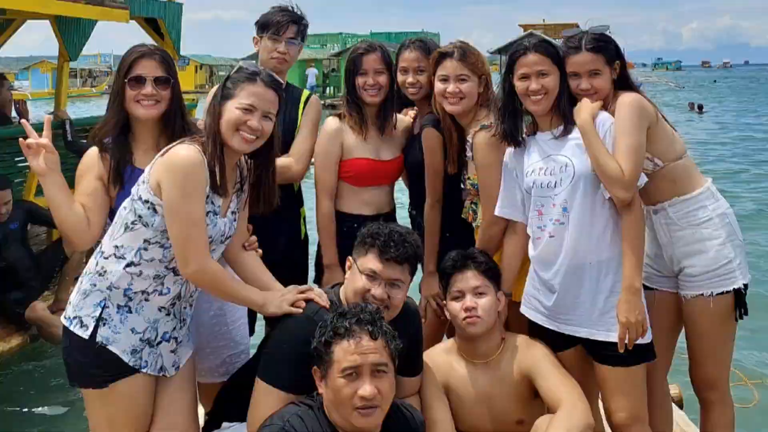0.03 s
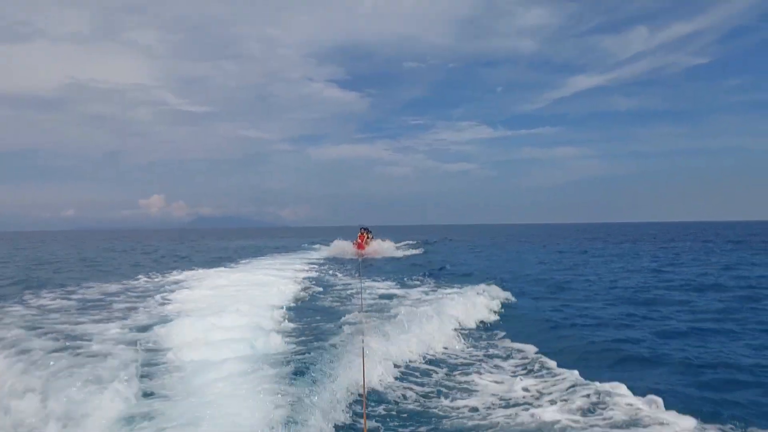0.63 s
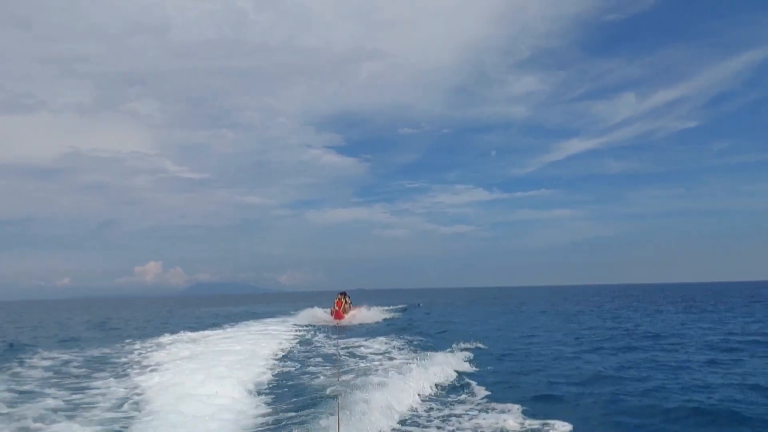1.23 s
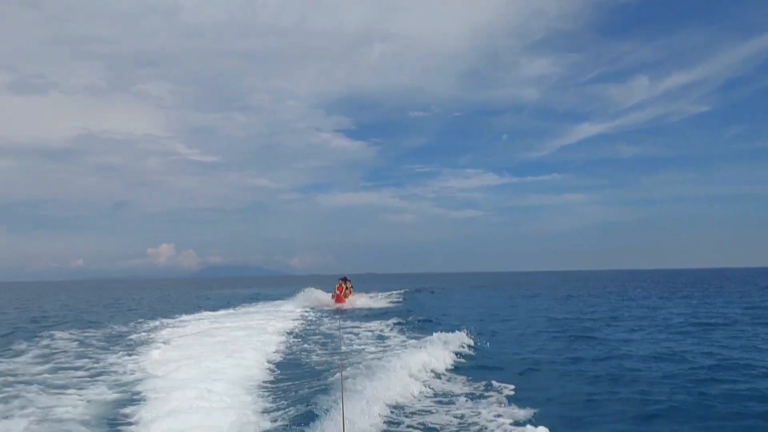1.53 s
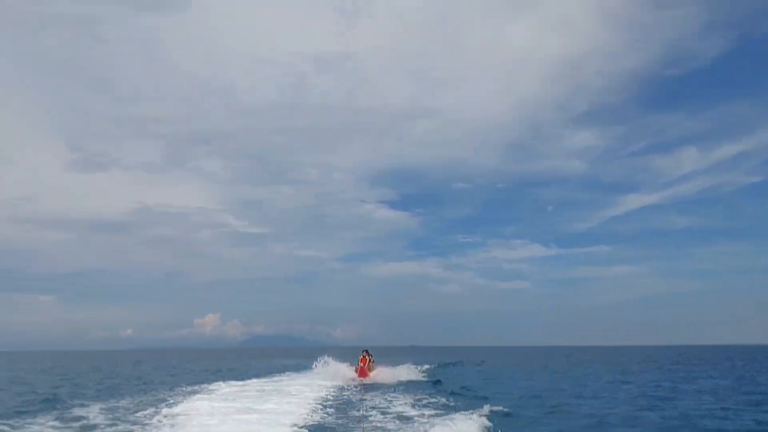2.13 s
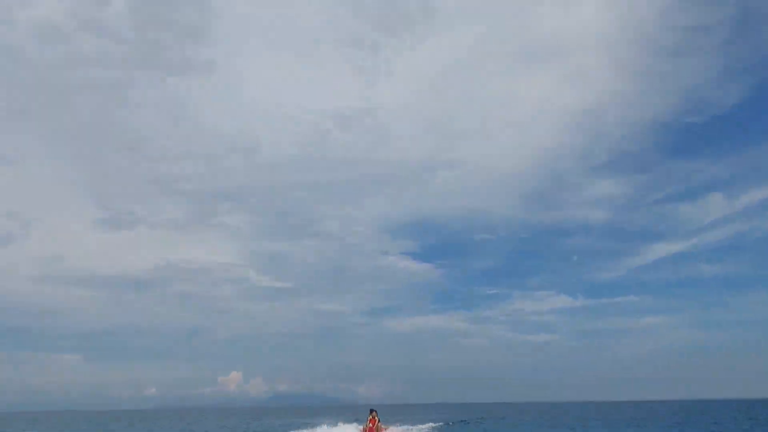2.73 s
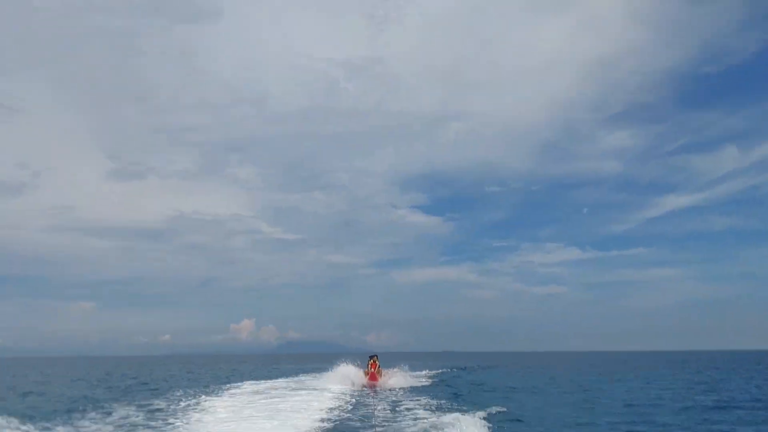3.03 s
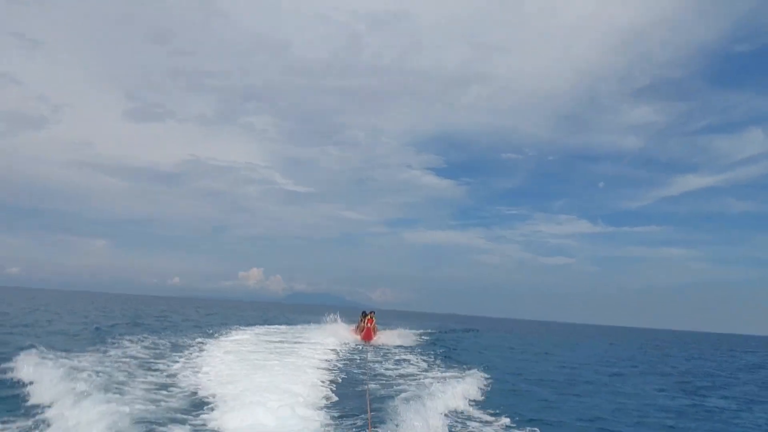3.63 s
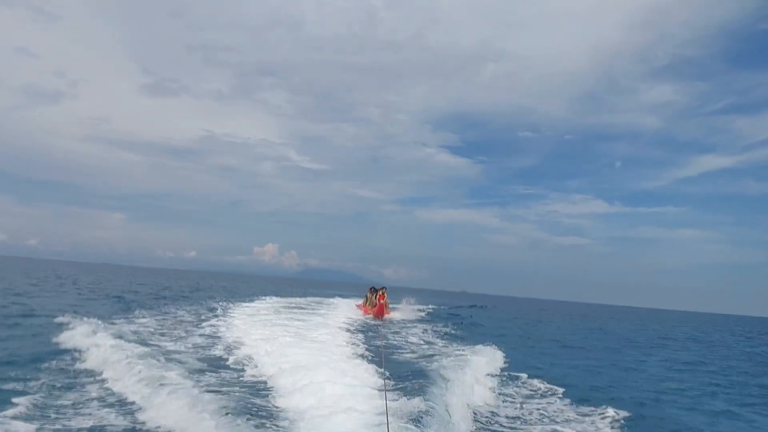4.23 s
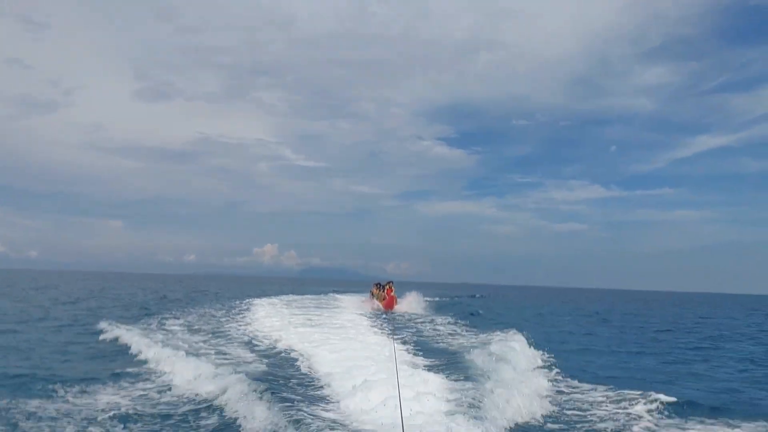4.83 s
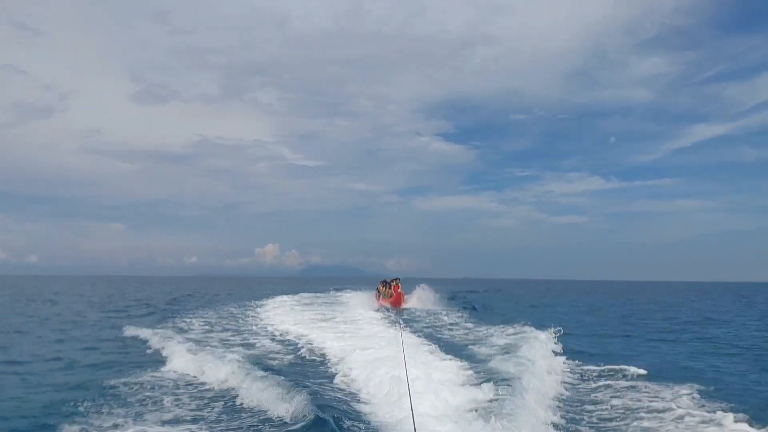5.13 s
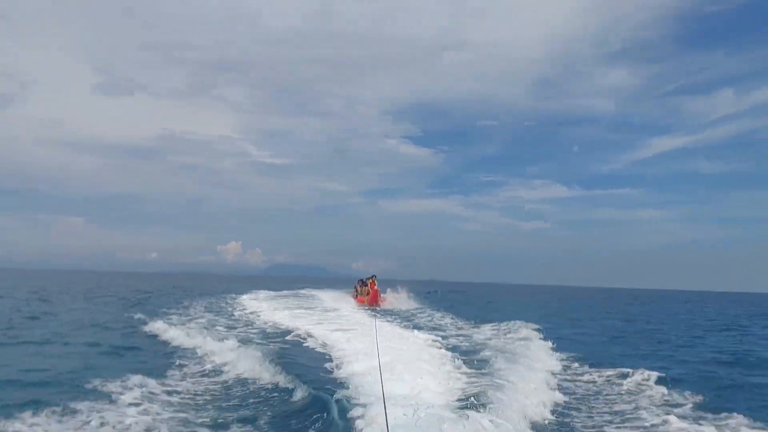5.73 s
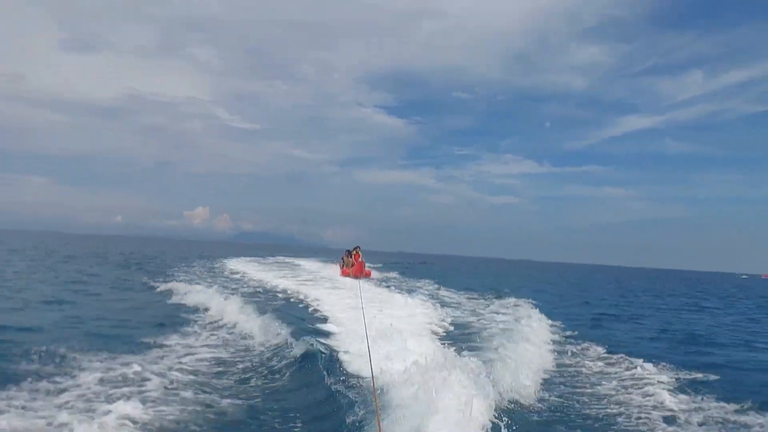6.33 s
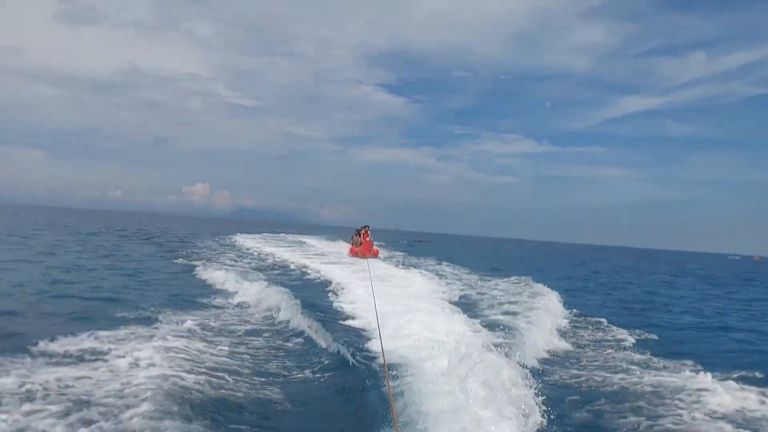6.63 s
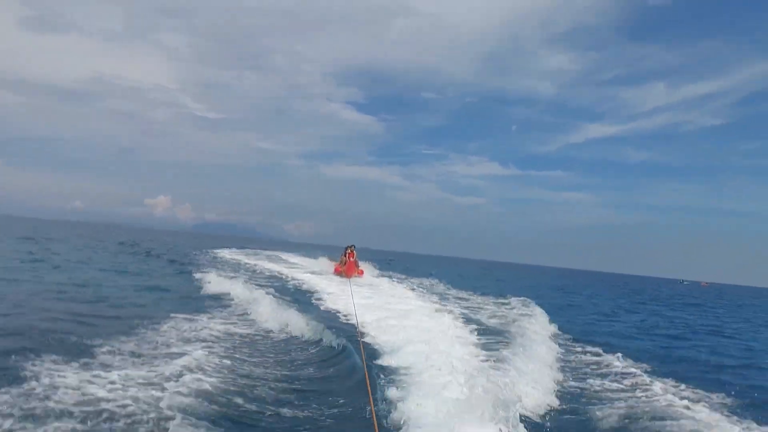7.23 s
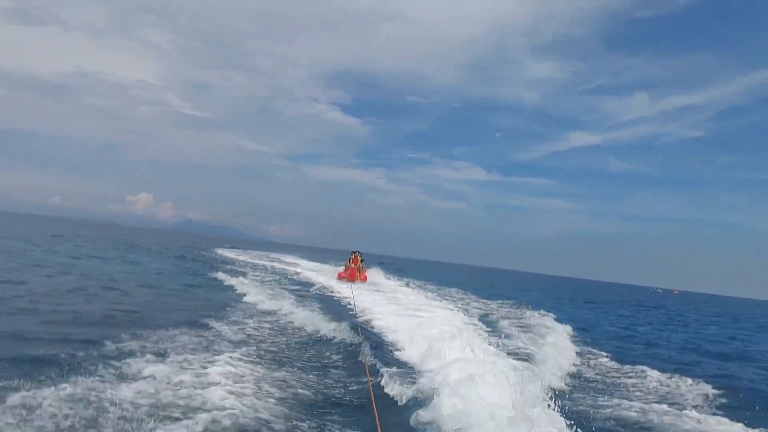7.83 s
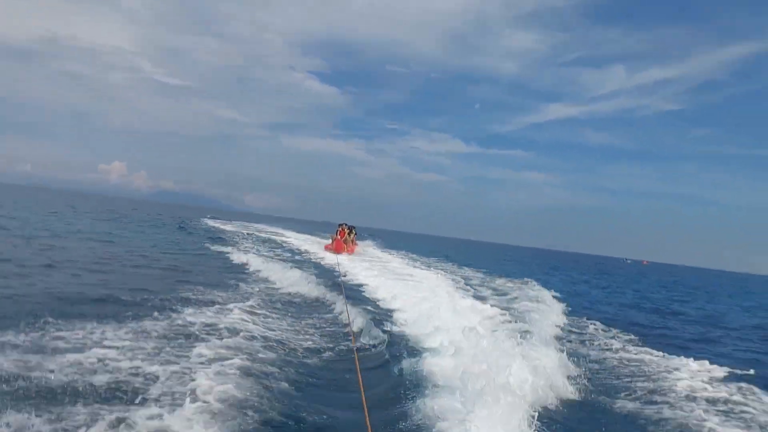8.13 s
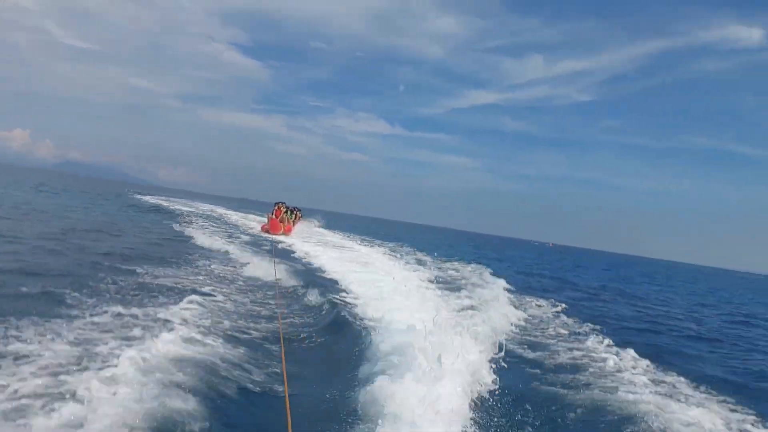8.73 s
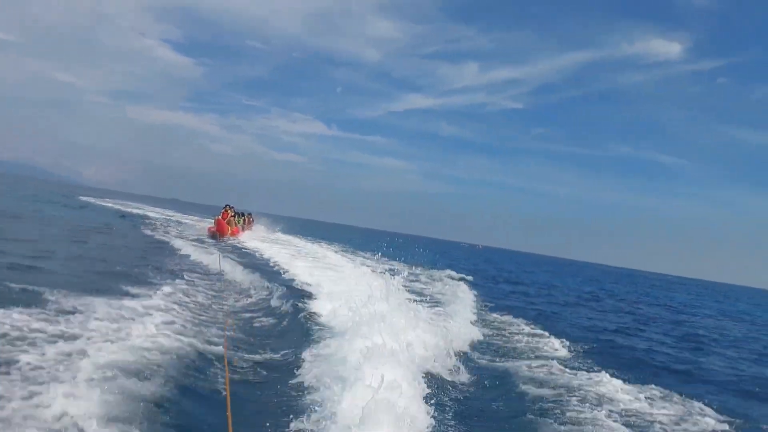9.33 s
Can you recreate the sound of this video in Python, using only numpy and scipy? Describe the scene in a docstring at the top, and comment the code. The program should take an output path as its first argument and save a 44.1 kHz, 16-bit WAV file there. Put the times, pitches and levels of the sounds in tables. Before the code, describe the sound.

The low, steady drone of a motorboat engine mixes with churning water and hissing spray, close to a phone held at the back of the boat at sea. A few sharp finger clicks come as the noise builds. About a third of the way in, the engine surges and whines, then settles. It pushes a little harder later, with the wake rushing more on the left and wind buffeting the microphone now and then.

```python
"""A motorboat tows an inflatable across open sea, heard from the stern on a hand-held phone.
From the start the exhaust drones and burbles over a churning wake and fizzing spray. The sound swells
in the first two seconds, as fingers tick on the case and gusts begin to buffet the microphones.
Near 3.5 s the hull lifts: the engine revs, booms and whines, and mist flies. The hull settles into
calmer water near 4.4 s, then from 6 s works harder as it leans into a turn."""
import sys
import numpy as np
from scipy import signal
from scipy.fft import rfft, irfft, next_fast_len
from scipy.io import wavfile
from scipy.ndimage import uniform_filter1d, minimum_filter1d

SR = 44100
rng = np.random.default_rng(int(sys.argv[2]) if len(sys.argv) > 2 else 0)


def store_wav(level_fs):
    """Save 16-bit WAV to argv[1]."""
    pcm = np.round(np.clip(np.atleast_2d(level_fs), -1, 1) * 32767)
    wavfile.write(sys.argv[1], SR, pcm.T.astype(np.int16))


N = 422037
TIME = np.arange(N) / SR

# Engine speed: (time [s], cycle rate [Hz])
ENGINE_SPEED = [(0.2, 61.36), (0.85, 62.1), (1.1, 61.3), (1.67, 63.45), (2.01, 60.95), (2.32, 62.27),
                (3.05, 63.12), (3.59, 67.0), (3.77, 67.05), (4.29, 63.23), (4.6, 62.62), (4.78, 63.34),
                (6.08, 62.4), (6.55, 63.7), (6.67, 63.0), (8.05, 63.23), (8.77, 62.38), (9.5, 62.63)]
# Leading tones of the drone: (time [s], order 3 level [dB], order 6 level [dB])
DRONE_LEVELS = [(0.2, -21.5, -27.5), (1.8, -19, -24.5), (2.01, -14.5, -34), (2.12, -12, -19.5),
                (2.25, -15, -27), (2.92, -16, -18), (3.23, -24, -23.5), (3.93, -19.5, -25),
                (4.08, -25, -31.5), (4.4, -16, -22), (6.34, -14.5, -26.5), (6.39, -19, -21.5),
                (6.88, -14.5, -32), (7.14, -16, -20.5), (8.51, -15.5, -21.5), (8.77, -12.5, -28),
                (8.93, -14, -21.5), (9.5, -16, -20)]
# Weaker exhaust harmonics: (order [multiple of cycle rate], level [dB])
WEAK_ORDERS = [(1, -44), (4, -32.5), (7, -34.5), (8, -36.5), (9, -38.5), (10, -43.5), (11, -46.5),
               (14, -54), (15, -45), (19, -43.5)]
# Machinery whine: (order before rounding [multiple of cycle rate], level [dB], peak time [s], spread [s])
WHINE_ORDERS = [(12, -35.5, 2.7, 1), (16, -33.5, 3.7, 0.47), (18, -31, 3.38, 0.23), (20, -37, 3.106, .25),
                (21.3, -35, 3.05, 0.41)]
# Spectrum of gas bursting through water: (frequency [Hz], relative level [dB])
BURBLE_SPECTRUM = [(70, -14), (100, -0.5), (140, 2), (220, 1), (290, 1), (360, -2), (430, -9.5), (540, -12),
                   (750, -25)]
# Strength of the wake: (time [s], roar gain [dB], splash gain [dB], spray gain [dB])
WAKE_GAINS = [(0.2, -31, -37, -41.5), (0.3, -34, -39, -44), (0.82, -33, -40.5, -43), (1.03, -28, -40, -41),
              (1.53, -28.5, -38.5, -39), (1.55, -26, -36, -39), (2.72, -27.5, -38, -34.5),
              (3.38, -26, -38, -32), (4.24, -28.5, -40.5, -41), (8.48, -29, -37, -41),
              (9.1, -30, -38.5, -41), (9.55, -28.5, -36.5, -41.5)]
# Spectrum of the wake's bubbles: (frequency [Hz], relative level [dB])
WASH_SPECTRUM = [(250, -34), (430, 0.5), (600, -2), (800, -1), (1150, 1), (1600, -1), (1850, -9.5),
                 (2400, -10), (2900, -18), (3600, -28), (5000, -44)]
# Shifting hollow colour of the wake's roar and splash, as from a reflection off the deck:
# (time [s], peak spacing [Hz], depth [dB])
DECK_COMB = [(.2, 1110, 3), (.65, 1180, 3.5), (1.02, 1400, 3.5), (1.4, 1150, 2.5), (1.65, 1040, 2),
             (2.1, 1663, 2.5), (2.5, 1430, 3.5), (3.05, 1350, 0), (3.55, 1070, 1.5), (4.2, 999, .5),
             (4.7, 1550, 0.6), (9.57, 1520, 0.8)]
# Bearing of the roar: (time [s], left minus right [dB])
ROAR_BEARING = [(0.2, 2), (1.19, 7.5), (2.2, 0.0), (3.43, 1.5), (3.97, 8), (6.27, 11.5), (9.37, 10),
                (9.55, 11)]
# Spectrum of the droplets: (frequency [Hz], relative level [dB])
SPRAY_SPECTRUM = [(1800, -20), (2900, -7.5), (3700, 0.5), (4900, 0), (5800, -3.5), (6600, -3), (7400, -7),
                  (8300, -9), (9400, -5), (10500, -6.5), (12000, -5), (13200, -7.5), (14200, -13),
                  (15500, -19)]
# Cavity of a hand cupping the left microphone: (time [s], resonance [Hz], height [dB])
HAND_CAVITY = [(.2, 4570, 2), (1.1, 5300, 3), (2.1, 5406, 1.5), (2.75, 5500, 7), (3.12, 5300, 12),
               (3.4, 4500, -0.5), (3.65, 4057, 4.5), (4.1, 4003, -7)]
# Spectrum of eddies at the microphones: (frequency [Hz], relative level [dB])
WIND_SPECTRUM = [(15, -26), (28, -13), (45, -5.5), (62, 0), (80, -6.5), (110, -20), (250, -17), (600, -56)]
# Gusts: (peak time [s], level [dB])
WIND_GUSTS = [(1.25, -31), (1.85, -24), (2.08, -26), (3.28, -32), (3.72, -30), (4.71, -29), (5.18, -27),
              (5.62, -27), (7.19, -24), (9.2, -29), (9.42, -23), (9.49, -23)]
# Finger touches, each near one microphone: (time [s], level [dB], left minus right [dB])
FINGER_TICKS = [(.6465, -17, 10), (.7333, -18, 10), (.7678, -12, 14), (1.3696, -4.5, -12),
                (1.3993, -12, -6), (1.4025, -6, -6), (1.7171, -5, 14), (1.7503, -2, 16), (2.1122, -13, 2)]
# Modes of the phone's case: (frequency [Hz], relative level [dB], time to decay by 60 dB [s])
CASE_MODES = [(950, -2, .009), (1500, 0, .009), (2150, 0, .007), (2800, -4, .005), (4600, -5, .003)]

# Bands in which the noises are normalised: (lower edge [Hz], upper edge [Hz])
WIND_BAND, BURBLE_BAND, ROAR_BAND, SPRAY_BAND = (20, 95), (215, 295), (950, 1800), (3300, 7000)
CRUISE_HZ, BOOM_DB_PER_HZ = 62.64, 1.63  # order 2 booms above the cruising rate
SECOND_DB, FIFTH_DB, BURBLE_DB, CHURN_DB, MIST_DB, BREEZE_DB = -23, -25.5, -27, -28, -41, -32
LIFT_BOOM_DB, LIFT_CHURN_DB, LIFT_SPLASH_DB, LIFT_MIST_DB = 7, 0.5, 3, 5  # gains at the top of the lift
CHURN_SHARE, SPLASH_BEARING_SHARE = 0.67, 0.6  # shares of the roar's level changes and of its bearing
SHADE_DB, SLIDE_FROM_S, SLIDE_TO_S = -5.5, 3.0, 3.49  # the hand shades the left until it slides off
GUST_RISE_S, GUST_FALL_S = 0.043, 0.026
START_S, TOP_HZ = 0.185, 15450


def exhaust(turns, cycle_hz, third_db, sixth_db):
    """Harmonic series: periodic firing puts the drone and whine at whole multiples of the cycle rate."""
    boom_db = BOOM_DB_PER_HZ * np.maximum(cycle_hz - CRUISE_HZ, 0) + LIFT_BOOM_DB * lift()
    second_db = SECOND_DB + boom_db + 0.19 * swell_db() + 0.66 * effort_db()
    fifth_db = FIFTH_DB + 0.3 * swell_db() + 3.9 * lift()
    second = undb(second_db) * harmonic(turns, order=2, waver_db=1, rough=0.093)
    third = undb(third_db - 0.17) * harmonic(turns, order=3, waver_db=1.1, rough=0.082)
    fifth = undb(fifth_db) * harmonic(turns, order=5, waver_db=2.6, rough=0.3)
    sixth = undb(sixth_db) * harmonic(turns, order=6, waver_db=0.8, rough=0.11)
    weak = sum(undb(db) * harmonic(turns, order, waver_db=2.5, rough=0.28) for order, db in WEAK_ORDERS)
    weak *= undb(0.83 * swell_db() + 0.76 * effort_db())
    whine = sum(undb(db) * hump(s, width) * harmonic(turns, round(order), waver_db=2, rough=0.29)
                for order, db, s, width in WHINE_ORDERS)
    return second * pan(1.7) + third + fifth * pan(-2.6) + sixth + weak * pan(0.44) + whine


def harmonic(turns, order, waver_db, rough):
    """Random modulation: an order wavers as waves cover the outlet, and uneven firings roughen it."""
    angle = 2 * np.pi * (order * turns + rng.random())
    amplitude = np.sqrt(2) * undb(waver_db * wander(4.6))
    sidebands = wander(18.5) * np.cos(angle) + wander(19.7) * np.sin(angle)
    return amplitude * (np.sin(angle) + rough * sidebands)


def burble(turns):
    """Amplitude-modulated noise: exhaust gas bursts through the water in gulps, once a cycle."""
    gulps = rng.standard_normal((2, N)) * (1 + 0.39 * np.cos(2 * np.pi * turns))
    gulps *= undb(0.79 * wander(16))
    gas = colour(spread(gulps, width=0.21), BURBLE_SPECTRUM)
    level_db = BURBLE_DB + 0.9 * swell_db() + effort_db() + wander(5.7)
    return normalise(gas, BURBLE_BAND) * undb(level_db)


def wash(turns, roar_db, splash_db):
    """Incoherent summation: bubbles churned up by the propeller burst so densely that they roar."""
    froth = rng.standard_normal((2, N)) + 0.54 * drops(per_second=3000, scatter_db=2.3)
    froth *= 1 + 0.059 * np.cos(2 * np.pi * turns)
    # Long waves reach both microphones alike, so the side signal is weaker in the bass.
    froth[1] = colour(froth[1], [(300, -4), (650, -9.5), (1200, -7.5), (1800, 1.5), (5000, 0)])
    bubbles = colour(spread(froth, width=1), WASH_SPECTRUM)
    water = normalise(bubbles, ROAR_BAND) * undb(0.5 * wander(9.6))
    comb_hz, comb_db = curves(DECK_COMB)
    side_db, = curves(ROAR_BEARING)
    churn_db = CHURN_DB + CHURN_SHARE * (roar_db - roar_db.mean())
    churn_db += LIFT_CHURN_DB * lift() + 0.55 * effort_db()
    splash_db = splash_db + LIFT_SPLASH_DB * lift() + 11

    def balance(hz, at):
        """Comb filtering, as from a deck reflection, hollows the roar and splash above the low churn."""
        low = np.clip((1100 - hz) / 300, 0, 1)
        high = np.clip((hz - 1650) / 300, 0, 1)
        middle = 1 - low - high
        ripple = np.cos(2 * np.pi * hz / comb_hz[at]) - 0.35
        ripple_db = comb_db[at] * np.clip((hz - 700) / 300, 0, 1) * ripple
        level_db = low * churn_db[at] + middle * (roar_db[at] + 0.23) + high * splash_db[at]
        bearing_db = low * 5.4 + (middle + high * SPLASH_BEARING_SHARE) * side_db[at]
        return undb(level_db + ripple_db) * pan(bearing_db)
    return reshape(water, balance, flicker_db=0.77)


def spray(spray_db):
    """Impact noise: droplets hiss and patter back; the finest mist swells just after the hull lifts."""
    patter = rng.standard_normal((2, N)) + 0.44 * drops(per_second=3500, scatter_db=2.5)
    fizz = normalise(colour(patter, SPRAY_SPECTRUM), SPRAY_BAND)
    cavity_hz, cavity_db = curves(HAND_CAVITY)
    mist_db = MIST_DB + 0.91 * effort_db() + 0.95 * swell_db() + LIFT_MIST_DB * lift(lag_s=0.11)
    shade_db = SHADE_DB * (1 - ramp(SLIDE_FROM_S, SLIDE_TO_S))

    def balance(hz, at):
        """Cavity resonance and shadowing: the hand on the left colours coarse spray and screens mist."""
        fine = np.clip((hz - 5800) / 2000, 0, 1)
        level_db = (1 - fine) * (spray_db[at] - 0.4) + fine * mist_db[at]
        height_db = cavity_db[at] * (1 - fine)
        resonance = np.exp(-0.5 * ((hz - cavity_hz[at]) / 360) ** 2) - 0.35
        cupped_db = np.array([height_db * resonance, -0.15 * height_db])
        bearing_db = fine * shade_db[at] - 3 * np.clip((hz - 9500) / 3500, 0, 1)
        return undb(level_db + cupped_db) * pan(bearing_db)
    return reshape(fizz, balance, flicker_db=1)


def wind():
    """Turbulent pressure: eddies thump on the microphone ports; breeze and gusts add in power."""
    eddies = colour(spread(rng.standard_normal((2, N)), width=0.59), WIND_SPECTRUM)
    breeze = undb(BREEZE_DB + 1.2 * swell_db() + effort_db() + 1.1 * wander(9.3))
    gusts = sum(undb(db) * hump(s, np.where(TIME < s, GUST_RISE_S, GUST_FALL_S)) for s, db in WIND_GUSTS)
    return normalise(eddies, WIND_BAND) * np.hypot(breeze, gusts)


def finger_ticks():
    """Impulse response: each touch gives a small crack and rings the damped modes of the case."""
    out = np.zeros((2, N))
    age = np.arange(1024) / SR
    for s, db, side_db in FINGER_TICKS:
        ring = np.zeros_like(age)
        for hz, mode_db, t60 in CASE_MODES:
            detune = np.exp(0.069 * rng.standard_normal())  # every touch lands elsewhere
            ring += undb(mode_db - 60 * age / t60) * np.sin(2 * np.pi * hz * detune * age)
        crack = 0.18 * rng.standard_normal(len(age)) * np.exp(-age / 0.00074)
        tick = ring + crack
        start = int(s * SR)
        out[:, start:start + len(age)] += undb(db) * pan(side_db) * tick / np.abs(tick).max()
    return out


def lift(lag_s=0):
    """Heave, 0 to 1: the hull rises once and the exhaust outlet clears the water."""
    return hump(3.46 + lag_s, width_s=0.24)


def effort_db():
    """Hydrodynamic load: the stern works less as the hull settles, more through the turn."""
    return -2 * hump(4.4, width_s=0.26) + 1.5 * ramp(6, 9.3)


def swell_db():
    """Crescendo: an opening rise to full level, which the layers follow in differing degrees."""
    return 6 * (ramp(0.77, 1.64) - 1)


def ramp(start_s, end_s):
    """Linear transition from 0 to 1."""
    return np.clip((TIME - start_s) / (end_s - start_s), 0, 1)


def hump(centre_s, width_s):
    """Gaussian pulse of height 1."""
    return np.exp(-0.5 * ((TIME - centre_s) / width_s) ** 2)


def undb(db):
    """Amplitude ratio of a level in decibels."""
    return 10 ** (np.asarray(db) / 20)


def curves(table):
    """Linear interpolation of a table's columns over time, one value per sample."""
    times, *columns = np.transpose(table)
    return [np.interp(TIME, times, column) for column in columns]


def wander(cutoff_hz):
    """Low-pass noise of standard deviation 1."""
    size = next_fast_len(N)
    hz = np.fft.rfftfreq(size, 1 / SR)
    x = irfft(rfft(rng.standard_normal(size)) / (1 + (hz / cutoff_hz) ** 4))[:N]
    return x / x.std()


def drops(per_second, scatter_db):
    """Shot noise: two channels of random clicks, mostly small and now and then large; rms 1."""
    sizes = undb(scatter_db * np.minimum(rng.exponential(size=(2, N)), 7))
    clicks = (rng.random((2, N)) < per_second / SR) * sizes * rng.standard_normal((2, N))
    return clicks / clicks.std()


def colour(x, spectrum):
    """Spectral shaping by a (frequency [Hz], level [dB]) curve, falling away beyond its ends."""
    size = next_fast_len(N)
    bin_hz = np.fft.rfftfreq(size, 1 / SR) + 1
    hz, db = np.transpose(spectrum)
    skirts = np.minimum(1, np.minimum(bin_hz / hz[0], hz[-1] / bin_hz)) ** 2
    gain = skirts * undb(np.interp(np.log(bin_hz), np.log(hz), db))
    return irfft(rfft(x, size) * gain, size)[..., :N]


def reshape(x, gain, flicker_db):
    """Time-varying filtering by gain(Hz, sample index); patches of the spectrum flicker at random."""
    hz, times, spectra = signal.stft(x, SR, nperseg=512)
    at = np.minimum((times * SR).astype(int), N - 1)
    patches = uniform_filter1d(rng.standard_normal(spectra.shape[1:]), size=9, axis=0)
    patches = uniform_filter1d(patches, size=5, axis=1)
    flicker = undb(flicker_db * patches / patches.std())
    return signal.istft(spectra * gain(hz[:, None], at) * flicker, SR)[1][:, :N]


def normalise(x, band):
    """Band-power normalisation: the mean of the two channels gets rms 1 within the band."""
    hz, density = signal.welch(x.mean(axis=0), SR, nperseg=4096)
    return x / np.sqrt(density[(hz >= band[0]) & (hz <= band[1])].sum() * hz[1])


def spread(x, width):
    """Mid-side stereo: left and right from a shared and an opposed signal."""
    return x[0] + width * x[1] * np.array([[1], [-1]])


def pan(db):
    """Constant-power panning: two gains for a left-minus-right level difference."""
    left, right = undb(db), np.ones_like(db, dtype=float)
    gains = np.array([left, right]) * np.sqrt(2 / (1 + left ** 2))
    return gains if np.ndim(db) else gains[:, None]


def scene():
    """Superposition: engine, water, wind and finger ticks add at the microphones."""
    cycle_hz, = curves(ENGINE_SPEED)
    third_db, sixth_db = curves(DRONE_LEVELS)
    roar_db, splash_db, spray_db = curves(WAKE_GAINS)
    turns = np.cumsum(cycle_hz) / SR  # engine phase in cycles
    engine = exhaust(turns, cycle_hz, third_db, sixth_db) + burble(turns)
    water = wash(turns, roar_db, splash_db) + spray(spray_db)
    return engine + water + wind() + finger_ticks()


def record(dry):
    """Peak and band limiting: the phone opens abruptly, holds down the highest peaks and cuts the top."""
    opened = np.clip((TIME - START_S) / 0.002, 0, 1)
    safe_gain = np.minimum(1, 0.88 / (np.abs(dry).max(axis=0) + 1e-9))
    limiter = uniform_filter1d(minimum_filter1d(safe_gain, size=601), size=601)
    lowpass = signal.ellip(10, 0.2, 80, TOP_HZ, fs=SR, output="sos")
    return signal.sosfilt(lowpass, dry * limiter * opened)


dry = scene()
out = record(dry)
store_wav(out)
```